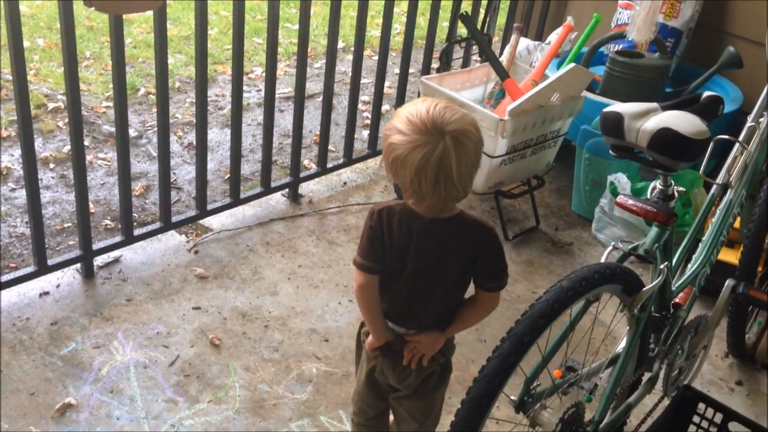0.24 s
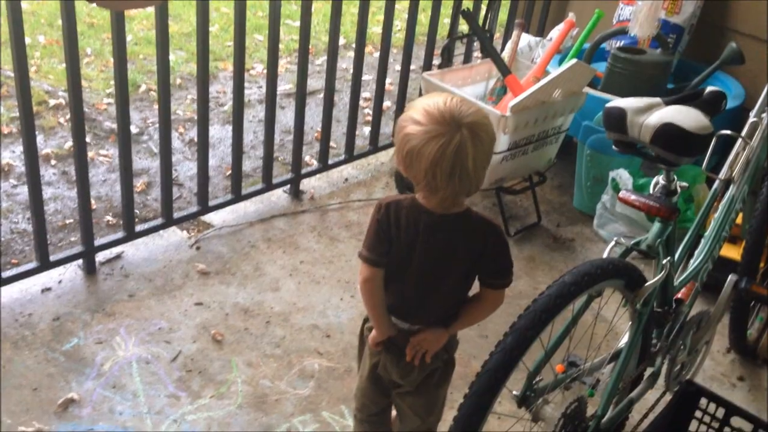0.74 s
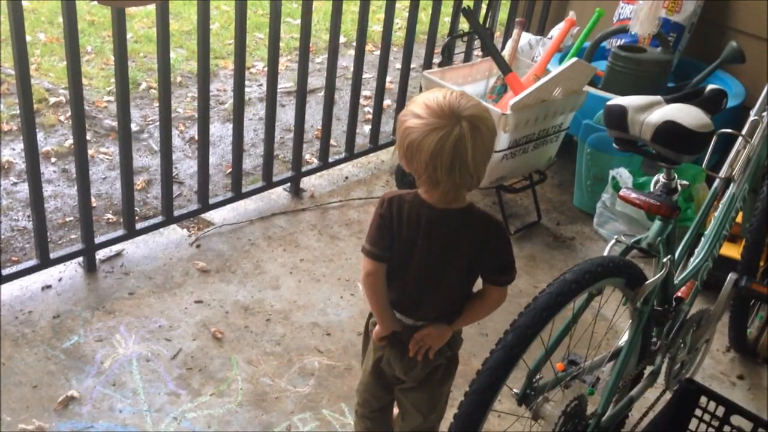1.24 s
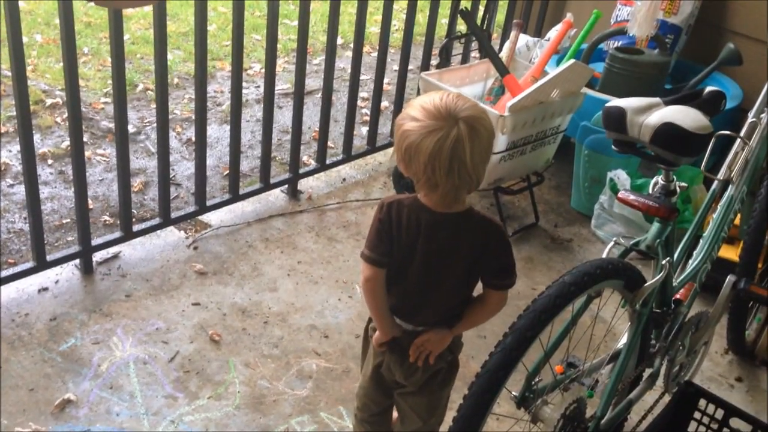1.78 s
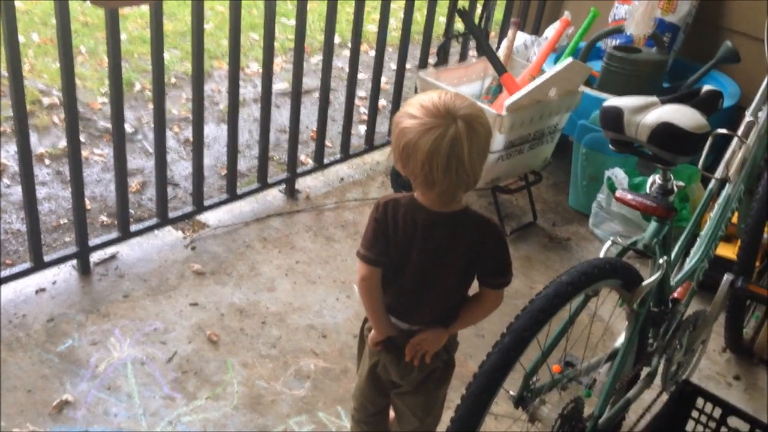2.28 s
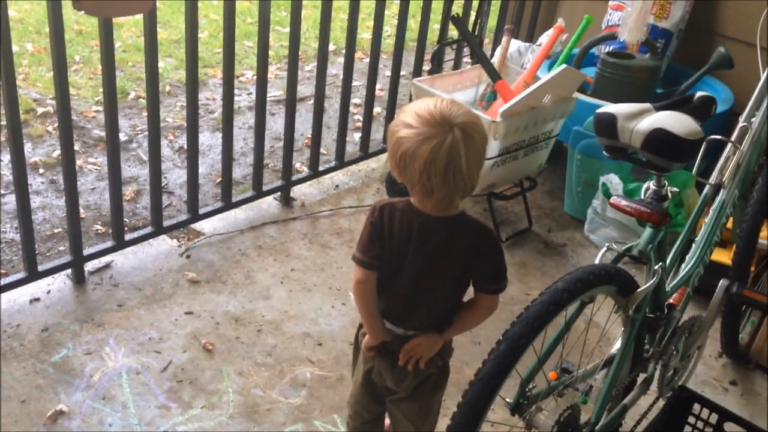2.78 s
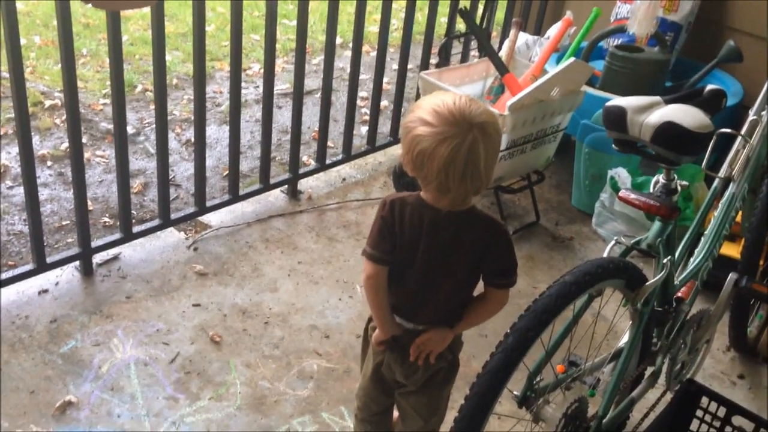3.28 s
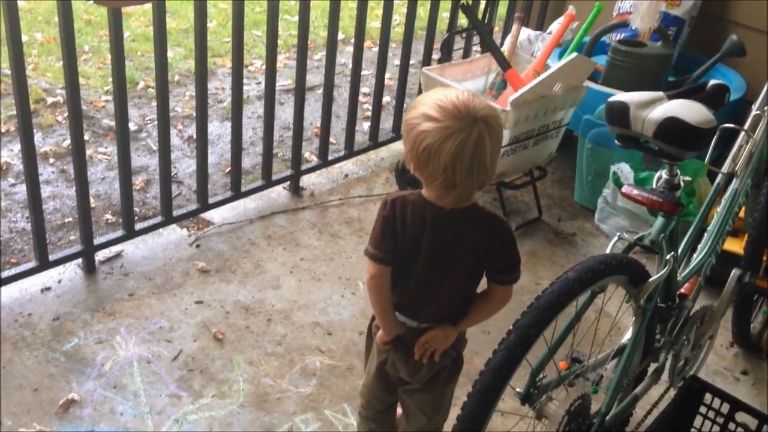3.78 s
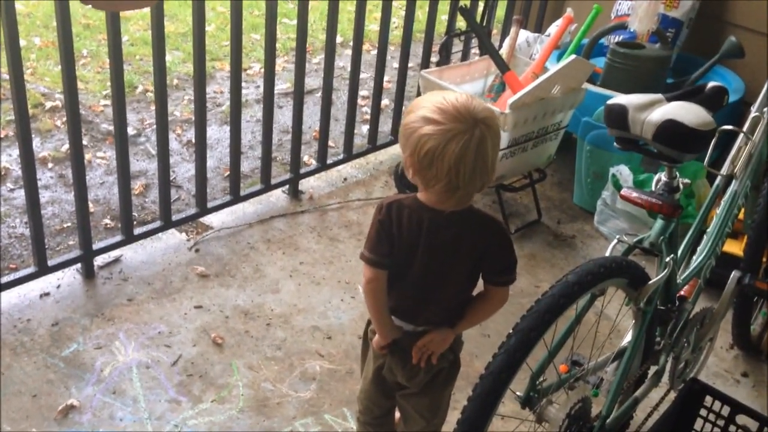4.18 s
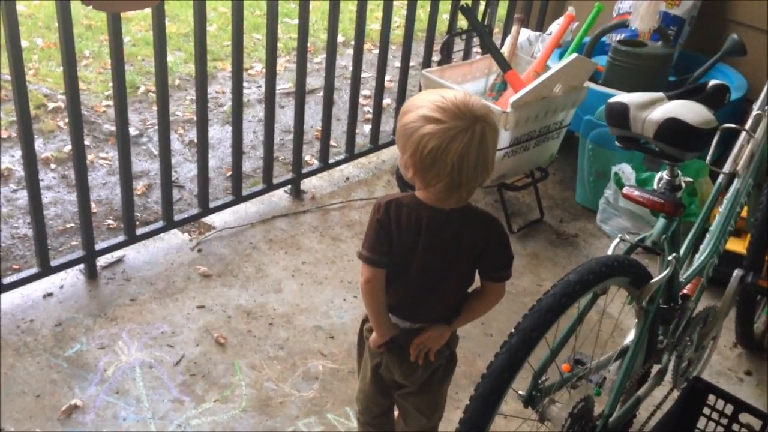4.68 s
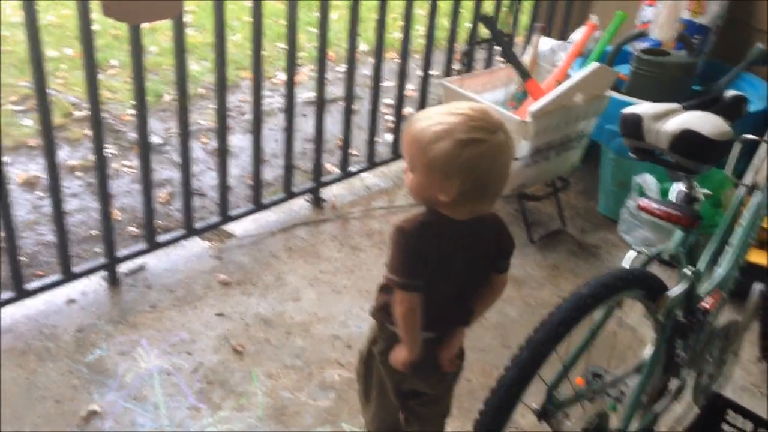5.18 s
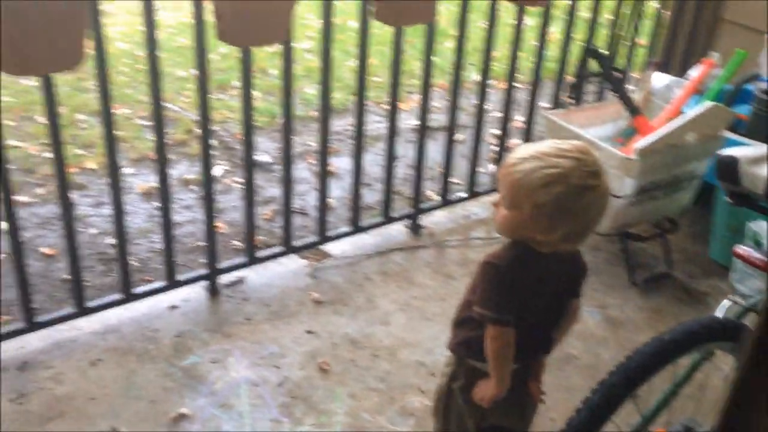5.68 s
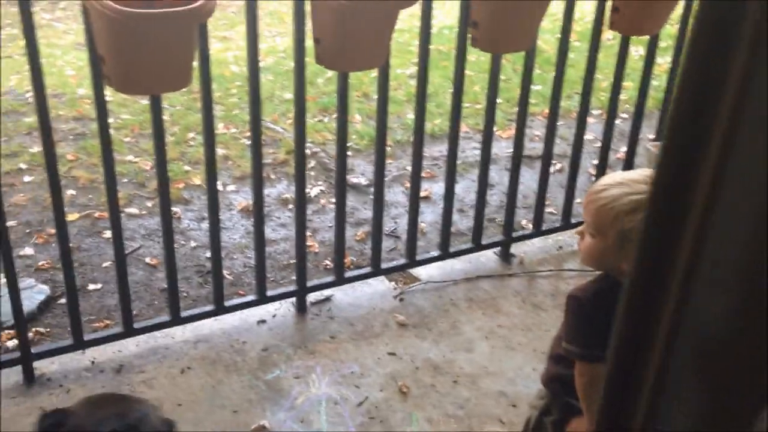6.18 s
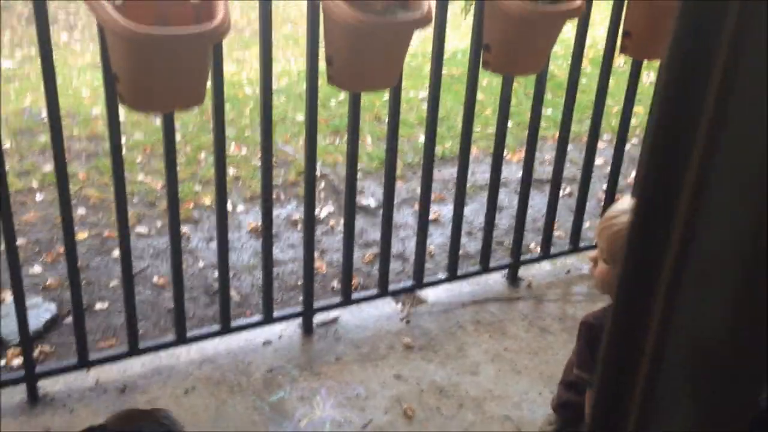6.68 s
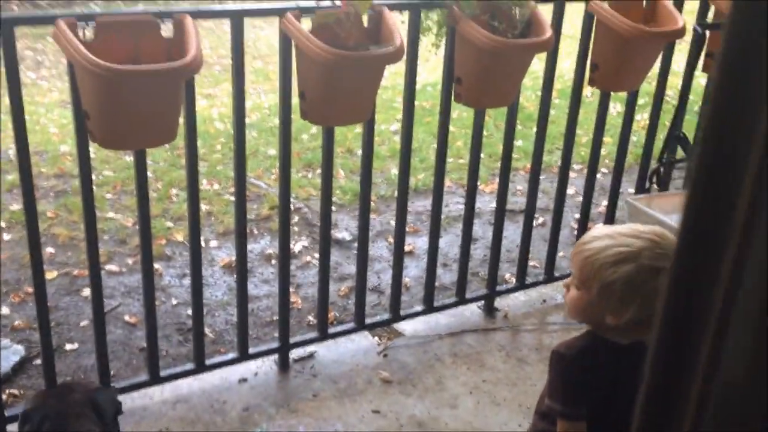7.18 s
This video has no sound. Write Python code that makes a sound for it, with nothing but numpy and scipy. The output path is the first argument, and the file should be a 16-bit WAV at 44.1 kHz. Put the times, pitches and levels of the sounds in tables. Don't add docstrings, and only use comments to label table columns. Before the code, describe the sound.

Steady rain hisses over a lawn beyond a covered patio, with sharp eave drips ticking close by and a faint compressor hum beneath.

```python
import sys
import numpy as np
from scipy import signal
from scipy.fft import rfft, irfft
from scipy.io import wavfile
from scipy.ndimage import uniform_filter1d, minimum_filter1d

SR = 44100
rng = np.random.default_rng(int(sys.argv[2]) if len(sys.argv) > 2 else 0)


def wav_record(signal):
    frames = np.transpose(np.atleast_2d(signal))
    bounded = np.clip(frames, -1, 1)
    quanta = np.round(bounded * 32767).astype(np.int16)
    wavfile.write(sys.argv[1], SR, quanta)


def to_linear_factor(level_db):
    exponent = np.asarray(level_db, float) / 20
    return 10 ** exponent


N = 328545

# t/s, level/dB
RAIN_LEVEL = [(0, -46.5), (2.8, -46), (5.6, -46), (7.45, -47)]
# f/Hz, density/dB
WASH_SPECTRUM = [(210, -48), (330, -10), (450, -11), (700, -13), (1400, -16.5), (2400, -16), (2850, -16),
                 (3650, -17.5), (6250, -19), (9000, -24.5), (12000, -29.5), (15400, -32.5)]
PATTER_PER_S, PATTER_DB, PATTER_SPREAD_DB = 700, -10, 3.2
TAPS_PER_S, TAPS_DB, TAPS_SPREAD_DB = 90, -12.5, 2.8

# t/s, level/dB per kHz, f/Hz, spread/octaves, sharpness/dB
NEAR_DRIPS = [(0.4377, -44, 6000, 0.3, 0), (0.6181, -50.5, 3990.0, 1.3, -2), (1.0359, -52, 5000.0, 0.95, 1),
              (1.2162, -48, 5450, 0.69, -8), (1.259, -55, 5500.0, 1, -12), (1.5898, -59, 6440.0, 1.4, -7),
              (1.8181, -54.5, 9340.0, 0.61, 0), (2.0617, -50.5, 5570, 1.3, 7),
              (2.2389, -58, 10360.0, 0.6, 11), (2.3233, -57, 5830.0, 1.3, 10),
              (2.4256, -55.5, 4500.0, 1.5, 6), (2.5439, -58, 8420.0, 0.92, 6),
              (3.5931, -45.5, 6060, 0.61, -1), (4.3837, -64, 10420.0, 0.57, -4),
              (4.4885, -52.5, 4200.0, 1.4, -3), (4.7639, -55.4, 5400.0, 1.3, -7),
              (5.186, -57, 8960.0, 0.64, 2), (5.4934, -50.5, 4600.0, .6, 1), (5.687, -45.5, 4270, 1.2, 2),
              (5.7894, -61.1, 11190.0, 0.3, 0), (5.9766, -53.5, 7060, 0.96, -10),
              (6.154, -54, 5400.0, 1.4, 4), (6.227, -54.5, 7490.0, 0.62, -3),
              (6.4392, -58.5, 10400.0, 0.55, -1), (6.5838, -43.5, 4870, 1, -1),
              (6.629, -57, 6200.0, 0.89, -1), (7.0905, -49, 4700.0, 0.89, 3),
              (7.3827, -43.5, 4900, 0.6, -1)]
# t/s, level/dB per kHz, f/Hz
FAR_DRIPS = [(0.023, -47, 2500), (0.74, -58, 5600.0), (0.836, -60, 8300.0), (1.4734, -57, 2700.0),
             (1.5103, -70, 12910.0), (1.6436, -65, 6430.0), (3.4492, -59, 4620.0), (3.5025, -56, 3430.0),
             (4.1968, -64.0, 9350.0), (5.132, -73, 7480.0), (5.373, -53, 4000.0), (5.883, -47.5, 3360),
             (6.0972, -63.4, 11120.0), (6.7162, -68, 6030), (6.7723, -58, 6170.0), (6.852, -59.5, 7800.0),
             (6.8931, -60, 6510.0), (6.9326, -65, 3000.0)]
# t/s, level/dB per kHz, f/Hz, spread/octaves
BURST_DROPLETS = [(.6181, -58, 12700, 0.58), (1.2147, -53, 10000, 0.5), (2.0625, -45.5, 3680, 0.33),
                  (2.0617, -56, 11500, 0.31), (3.5931, -54.5, 13500, 0.46), (5.132, -69, 8300, 0.21),
                  (5.4934, -53, 9700, 0.45), (5.627, -57, 7000, .35), (6.7162, -73, 11000, .8),
                  (6.9326, -80, 11000, .8), (5.687, -56, 8550, .3), (5.9766, -62, 8300, .25),
                  (6.5838, -46, 9050, 0.13)]
# delay/s, level/dB
PATIO_ECHOES = [
    (.0027, -5),
    (.0062, -11),
    (.0088, -9),
    (.0117, -10),
    (.0145, -12),
]
FAR_SPREAD_OCTAVES = 0.78
PATIO_T60_S, LOW_T60_S, EARLY_T60_S = .15, .08, .085
LATE_DB, LATE_T60_S = -10, .4
SKIRT_DB, LOW_SKIRT, THUD_HZ = 15, 0.99, 1990
TICK_DB, TICK_DB_PER_OCTAVE = 8, 2
UNEVEN_DB = 2

# t/s, level/dB, brightness/dB, length/s
RUNOFF_SLUGS = [(.146, -55.5, -5, .011), (.216, -48, 3, .008), (.26, -53, 1, 0.021), (.59, -53.5, 4, 0.018),
                (.966, -52.5, -3, 0.0086), (1.051, -63, -14, .013), (1.367, -51.5, -2, 0.0073),
                (1.473, -48, 4, 0.011), (1.692, -51, 1, 0.022), (1.751, -58, -4, 0.036),
                (1.872, -54.5, 6, .008), (2.073, -58, 13, .023), (2.088, -48, -0.5, 0.033),
                (2.136, -49.5, -2, 0.0083), (2.233, -51, -1, .008), (2.407, -52.5, 0, 0.025),
                (2.666, -52, -1, .008), (2.743, -50, -4, .016), (2.914, -51, 3, .06),
                (2.99, -56, -7, 0.056), (3.103, -52.5, -5, .008), (3.213, -51, -5.5, 0.0061),
                (3.492, -52, 4, 0.009), (3.556, -51.5, -1, 0.0082), (3.809, -50, 2, 0.012),
                (3.865, -51, -3, .008), (4.472, -56.5, 0, 0.077), (4.689, -54, -2, 0.021),
                (4.795, -54, -8, 0.019), (5.186, -56, -8, .018)]
# t/s, level/dB, brightness/dB
PIPE_GURGLES = [(.063, -54, -5), (.437, -49, 4), (.472, -57, 10), (.84, -58, -5), (.935, -64, 3),
                (1.23, -56, -4), (2.443, -55, -3), (3.299, -59, -5), (3.655, -60, -7), (4.235, -67, -8),
                (4.82, -63, -6), (5.36, -52, 3), (5.465, -56, 6), (5.925, -62, 15), (6.098, -62, -9),
                (6.181, -59, 10), (6.282, -60, 9), (6.318, -55.5, -1), (6.71, -60, 0), (6.79, -56, -3),
                (7.076, -53, 4)]
# f/Hz, width/Hz, level/dB
PIPE_MODES = [
    (790, 480, 0),
    (1590, 380, 0),
    (2430, 450, -1),
]
# f/Hz, level/dB
SPRAY_SPECTRUM = [(1800, -30), (2900, -3), (3600, 0), (4500, -3), (6500, -18), (16000, -50)]
GURGLE_S, SPRAY_DB, SPLASH_T60_S = 0.013, -5.5, 0.17

# t/s, level/dB, f/Hz
RAILING_TICKS = [(0.0232, -44.4, 9600), (0.1336, -44.6, 8600), (0.1501, -49.0, 9500), (0.2137, -49.7, 9900),
                 (0.2478, -45.5, 11000), (0.2744, -45.3, 8600), (0.345, -45.1, 9400), (0.6915, -48.8, 9300),
                 (0.903, -47.9, 9600), (1.1848, -50.3, 11000), (1.2789, -44.8, 9100),
                 (1.3317, -48.6, 10100), (1.5112, -49.7, 10600), (1.6414, -49.3, 10700),
                 (1.6483, -49.4, 10800), (1.8354, -45.6, 8800), (1.9922, -44.5, 6500),
                 (2.0019, -49.2, 10200), (2.2269, -46.7, 9200), (2.3017, -44.9, 8500),
                 (2.4432, -48.3, 11000), (2.8464, -49.6, 10400), (2.8754, -46.6, 7500),
                 (3.2465, -47.3, 8100), (3.4509, -45.6, 8800), (3.6595, -48.3, 10300),
                 (3.7385, -50.1, 9400), (3.8428, -48.1, 10600), (3.8787, -48.6, 9700),
                 (3.8911, -44.7, 8100), (4.0214, -50.9, 11500), (4.0683, -46.9, 10100),
                 (4.2733, -44.7, 9700), (4.3422, -45.2, 10900), (4.4029, -48.1, 11800),
                 (4.6803, -44.7, 10400), (4.6884, -49.7, 10600), (4.8945, -50.1, 9900),
                 (5.0441, -50.1, 11800), (5.1325, -42.2, 8600), (5.2319, -46.9, 9500),
                 (5.3789, -42.9, 7600), (5.5993, -47.7, 8900), (5.6248, -44.9, 9200),
                 (5.7651, -44.1, 10000), (5.8465, -47.3, 9000), (6.3048, -48.6, 9000),
                 (6.339, -50.7, 10000), (6.3806, -45.2, 8400), (6.5378, -47.7, 8100), (6.5542, -48.4, 9500),
                 (6.6627, -46.0, 9800), (6.7165, -44.3, 9500), (6.7778, -43.0, 7700),
                 (6.9328, -42.6, 10100), (7.0149, -48.3, 9300), (7.0369, -49.7, 9500),
                 (7.4114, -47.5, 10300), (7.4279, -51, 10000), (7.4491, -46.6, 7100)]
# t/s, level/dB, f/Hz
DRIP_SPLINTERS = [(1.2149, -42, 12000), (1.222, -43, 4000), (1.2695, -46, 4300), (1.306, -42, 4500),
                  (6.6294, -45, 6000), (6.662, -45, 7000), (1.2765, -47, 11000), (3.5978, -46, 6300),
                  (5.6825, -40, 7500), (5.6985, -39.5, 6000), (7.3852, -39, 4800), (7.3938, -42, 5200)]
TICK_CYCLES, TICK_TAIL, TICKS_DB = .9, .13, .5

# t/s, level/dB, f/Hz, length/s
PUDDLE_BUBBLES = [(.812, -58, 2540, .022), (.845, -59, 2400, .03), (.887, -57, 2680, .02),
                  (.935, -51, 2520, .025), (0.964, -53, 2400, 0.026), (1.005, -56, 2070, .022),
                  (1.068, -57, 2420, .022), (1.1, -60, 2080, .045), (1.222, -52, 1430, 0.015),
                  (1.218, -59, 2700, .02), (1.235, -59, 2140, .022), (1.285, -56, 2190, 0.035),
                  (.915, -58, 2080, .03), (0.958, -55, 1904, .028), (1.165, -60, 2200, .02),
                  (1.325, -56, 2280, .022), (1.34, -55, 1720, 0.023), (1.364, -53, 2395, .03),
                  (1.372, -56, 1495, .03)]
BUBBLE_RISE_HZ_PER_S = 4500

# t/s, f/Hz, level/dB, length/s
BRAKE_SQUEAL = (5.728, 1948.5, -57.5, .18)

# t/s, level/dB
HUM_LEVEL = [(0, -47), (.3, -45), (.7, -46.5), (2, -45.5), (2.2, -48), (2.35, -45.5), (2.8, -45),
             (3.2, -45.5), (3.6, -46), (3.9, -45), (4.1, -48), (5, -48), (5.2, -49.5), (5.45, -47.5),
             (5.7, -51), (6.1, -47.5), (6.3, -49.5), (7.45, -47.5)]
# t/s, level/dB
RUMBLE_LEVEL = [(0, -49.5), (.55, -54), (.72, -46.5), (1.05, -52), (1.35, -49.5), (1.6, -51.5),
                (2.2, -51.5), (2.8, -49), (3.3, -52.5), (3.75, -50.5), (4.6, -50.5), (5.2, -50.5), (6, -52),
                (7.45, -52)]
# f/Hz, density/dB
RUMBLE_SPECTRUM = [(20, -60), (35, -51), (55, -10.5), (80, -11), (115, -11), (135, -4), (150, 0.5),
                   (172, -6), (198, -2.5), (245, -8.5), (295, -4.5), (330, -10), (430, -58), (700, -103)]
# t/s, peak/dB, f/Hz
RUMBLE_THUMPS = [(0.299, -43, 206), (0.606, -41, 180), (0.715, -46, 231), (0.976, -45, 218),
                 (1.169, -38, 161), (1.749, -38, 158), (2.11, -39, 181), (2.554, -43, 171),
                 (2.644, -37, 164), (2.79, -36, 147), (2.939, -38, 144), (3.15, -37, 196),
                 (3.306, -45, 172), (3.741, -41, 170), (3.837, -34, 150), (4.239, -31, 144),
                 (4.334, -45, 161), (4.426, -39, 158), (4.845, -34, 128), (5.139, -54, 146),
                 (5.444, -40, 157), (6.11, -51, 153), (6.381, -42, 157), (7.114, -38, 156)]
HUM_HZ, HUM_OCTAVE_DB, HUM_WAVER_DB = 349.0, -22, 1.2
THUMP_DB, THUMP_RISE_S, THUMP_T60_S = -1, 0.0058, 0.12

# f/Hz, level/dB
PORT_NOTCH = [(2450, 0), (2650, -4), (2750, -3), (2900, -4.5), (3200, 0)]
# t/s, share/1
NOTCH_SHARE = [(0, 1), (5, .9), (6, .35), (7.45, .35)]
# t/s, rarity/standard deviations
GAP_RARITY = [(0, 2.3), (3.3, 1.8), (3.8, 1.1), (6.8, 1.1), (7.45, 2.8)]
# t/s, f/Hz, level/dB
SIDE_PATCHES = [(.56, 13200, -80), (1.1, 11100, -76), (1.45, 9700, -69), (1.73, 12800, -71),
                (1.75, 8300, -67), (3.38, 11700, -71), (4.23, 5200, -64), (4.61, 10400, -70),
                (4.97, 6100, -61), (5.28, 5800, -64), (7.25, 9000, -67)]
EDGE_HZ, SPILL_OVER_DB, SPILL_DB = 15310, 5, -28


def evened(x):
    return x / np.sqrt(np.mean(x ** 2) + 1e-20)


def smooth_twice(x, samples):
    return evened(uniform_filter1d(uniform_filter1d(x, size=samples), size=samples))


def read(points, hz):
    f, value = np.transpose(points)
    return np.interp(np.log(hz + 1), np.log(f + 1), value)


def along(rows):
    return np.interp(np.arange(N) / SR, *np.transpose(rows))


def add(mix, s, sound):
    part = mix[max(round(s * SR), 0):][:len(sound)]
    part += sound[:len(part)]


def colour(x, points):
    return irfft(rfft(x) * to_linear_factor(read(points, np.fft.rfftfreq(len(x), 1 / SR))), len(x))


def ring(x, points):
    gain_db = np.maximum(read(points, abs(np.fft.fftfreq(len(x), 1 / SR))), -130)
    response = np.exp(np.conj(signal.hilbert(np.log(to_linear_factor(gain_db)))))
    return np.fft.ifft(np.fft.fft(x) * response).real


def hiss(points, patchy_db, flicker_db, size):
    frames, hz = 4 * N // size + 5, np.fft.rfftfreq(size, 1 / SR)
    a, b, patches, flicker = rng.standard_normal((frames, len(hz), 4)).T
    patches = evened(uniform_filter1d(uniform_filter1d(patches, size=12, axis=0), size=10, axis=1))
    flicker = uniform_filter1d(flicker, size=len(hz) // 3, axis=0)
    flicker = evened(uniform_filter1d(flicker, size=3, axis=1))
    level_db = read(points, hz)[:, None] + patchy_db * patches
    level_db = level_db + flicker_db * flicker * (hz[:, None] / 4000) ** .3
    z = (a + 1j * b) * to_linear_factor(level_db)
    return evened(signal.istft(z, nperseg=size, noverlap=size * 3 // 4)[1][:N])


def random_drops(per_s, spread_db, most):
    size = to_linear_factor(spread_db * np.minimum(rng.exponential(1, N), most))
    return size * (rng.random(N) < per_s / SR)


def rain():
    wash = hiss(WASH_SPECTRUM, patchy_db=1.5, flicker_db=1.15, size=512)
    total = wash + to_linear_factor(PATTER_DB) * patter() + to_linear_factor(TAPS_DB) * taps()
    return to_linear_factor(along(RAIN_LEVEL)) * evened(total)


def patter():
    drops = random_drops(PATTER_PER_S, PATTER_SPREAD_DB, 3.3)
    kind, t, out = rng.integers(0, 24, N), np.arange(2600) / SR, np.zeros(N)
    for k, hz in enumerate(np.geomspace(1500, 14000, num=24)):
        snap = np.sin(2 * np.pi * hz * t) * np.exp(-t * hz)
        tail = np.zeros(len(t))
        tail[0] = 1
        tail += 0.22 * rng.standard_normal(len(t)) * to_linear_factor(-60 * t / PATIO_T60_S)
        grain = evened(signal.fftconvolve(snap, tail)[:len(t)])
        grain *= to_linear_factor(read(WASH_SPECTRUM, hz)) * np.sqrt(hz) * (1 + hz / 20000)
        out += signal.oaconvolve(drops * (kind == k), grain)[:N]
    return evened(out)


def taps():
    drops = random_drops(TAPS_PER_S, TAPS_SPREAD_DB, 3.5)
    kind, out = rng.integers(0, 8, N), np.zeros(N)
    for k, hz in enumerate(np.geomspace(2500, 12000, num=8)):
        grain = tick(hz, rng.standard_normal(2048)) * (2500 / hz) ** .4
        out += signal.oaconvolve(drops * (kind == k), grain)[:N]
    return evened(out)


def tick(hz, chance):
    t = np.arange(len(chance)) / SR
    snap = np.sin(2 * np.pi * .62 * hz * t[:64]) * np.exp(-t[:64] * hz / TICK_CYCLES)
    tail = TICK_TAIL * chance * (t > .002) * to_linear_factor(-60 * t / PATIO_T60_S) + (t == 0)
    return np.convolve(np.diff(snap, prepend=0) / np.linalg.norm(np.diff(snap)), tail)


def drip_blow(hz, sharp_db, chance):
    blow = np.zeros(len(chance))
    blow[64] = 1
    for s, echo_db in PATIO_ECHOES:
        delay = round(s * SR)
        blow[64 + delay] = to_linear_factor(echo_db + 2 * chance[delay] - 1.3 * max(sharp_db, 0))
    pole = [1, -1.6 * np.cos(2 * np.pi * hz / SR), .64]
    return signal.lfilter(pole[::-1], pole, blow)


def drip_tail(t, chance):
    low = signal.sosfilt(signal.butter(3, 4200, fs=SR, output="sos"), chance[::-1])
    high = signal.sosfilt(signal.butter(3, 4200, "high", fs=SR, output="sos"), chance)
    scattered = high + 1.3 * low * to_linear_factor(-60 * t / LOW_T60_S + 60 * t / PATIO_T60_S)
    scattered *= to_linear_factor(1.5 * evened(uniform_filter1d(chance[::-1], size=130)))
    fills = 1 - np.exp(-(np.maximum(t, 0) / .0015) ** 2)
    tail = np.convolve(scattered, [1, .25])[:len(t)] * fills
    late = to_linear_factor(LATE_DB - 60 * t / LATE_T60_S) * np.cos(np.pi / 2 * t / t[-1])
    return tail * (to_linear_factor(-60 * t / EARLY_T60_S) + late)


def drip(db, hz, spread, sharp_db, chance):
    t = (np.arange(len(chance)) - 64) / SR
    blow = np.convolve(drip_blow(hz, sharp_db, chance), [1, -.2])[:len(t)]
    tick_db = TICK_DB + sharp_db + TICK_DB_PER_OCTAVE * np.log2(hz / 6000)
    burst = 6.5 * to_linear_factor(tick_db) * blow + drip_tail(t, chance)
    f = np.geomspace(500, 20000, num=60)
    spreads_off = np.log2(f / hz) / (spread * np.where(f < hz, LOW_SKIRT, 1))
    bell = db - SKIRT_DB * spreads_off ** 2 - 10 * np.log10(1 + (THUD_HZ / f) ** 3)
    bell = np.maximum(bell, db - 40) + UNEVEN_DB * evened(uniform_filter1d(chance[-60:], size=2))
    return to_linear_factor(13.4) * ring(burst / np.std(burst[64:944]), list(zip(f, bell)))


def pipe_mode(hz, f, width, db):
    band = np.exp(-(np.log(hz / f + 1e-9) / .55) ** 4)
    return to_linear_factor(db) * (.4 + 1 / (1 + (2 * (hz - f) / width) ** 2)) * band


def splash(low_db, upper_db, spray_db, length, chance):
    t, hz = np.arange(len(chance)) / SR, np.fft.rfftfreq(len(chance), 1 / SR)
    broken = chance * to_linear_factor(3.2 * evened(uniform_filter1d(chance[::-1], size=110)))
    modes = [pipe_mode(hz, *row) for row in PIPE_MODES]
    low = evened(irfft(rfft(broken) * modes[0], len(t)))
    upper = evened(irfft(rfft(broken) * sum(modes[1:]), len(t)))
    spray = evened(colour(broken, SPRAY_SPECTRUM))
    sound = to_linear_factor(low_db - 3.5) * low + to_linear_factor(upper_db) * upper + to_linear_factor(spray_db) * spray
    decay = to_linear_factor(2.0 - 60 * np.maximum(t - length, 0) / SPLASH_T60_S)
    return decay * (1 - np.exp(-t / .0018)) * sound


def bubble(db, hz, length):
    t = np.arange(round(length * SR)) / SR
    tone = np.sin(2 * np.pi * (hz + BUBBLE_RISE_HZ_PER_S * t / 2) * t)
    return to_linear_factor(db + 5) * np.sin(np.pi * (t / length) ** .7) * tone


def squeal():
    s, hz, db, length = BRAKE_SQUEAL
    t = np.arange(round(length * SR)) / SR
    swell_db = 6 * np.sin(np.pi * (t / length) ** .7) - 5 * t / length
    swell = signal.windows.tukey(len(t), .3) * to_linear_factor(swell_db)
    flutter = to_linear_factor(.6 * smooth_twice(rng.standard_normal(len(t)), 250))
    return s, to_linear_factor(db) * swell * flutter * np.sqrt(2) * np.sin(2 * np.pi * hz * t)


def compressor():
    turn = 2 * np.pi * HUM_HZ * np.arange(N) / SR
    waver = smooth_twice(rng.standard_normal(N), 1500)
    line = np.sqrt(2) * (np.sin(turn) + to_linear_factor(HUM_OCTAVE_DB) * np.sin(2 * turn))
    rumble = hiss(RUMBLE_SPECTRUM, patchy_db=2.0, flicker_db=1.5, size=4096)
    return to_linear_factor(along(HUM_LEVEL) + HUM_WAVER_DB * waver) * line + to_linear_factor(along(RUMBLE_LEVEL)) * rumble


def thump(db, hz):
    t = np.arange(8192) / SR
    decay = to_linear_factor(db + THUMP_DB - 60 * t / THUMP_T60_S)
    return decay * (1 - np.exp(-t / THUMP_RISE_S)) * np.sin(2 * np.pi * hz * t)


def scene():
    mix = rain() + compressor()
    drips = list(NEAR_DRIPS)
    drips += [(*row, FAR_SPREAD_OCTAVES, 0) for row in FAR_DRIPS]
    drips += [(*row, 0) for row in BURST_DROPLETS]
    for s, *row in drips:
        add(mix, s - 64 / SR, drip(*row, rng.standard_normal(6144)))
    slugs = list(RUNOFF_SLUGS) + [(*row, GURGLE_S) for row in PIPE_GURGLES]
    for s, db, bright_db, length in slugs:
        chance = rng.standard_normal(8192)
        add(mix, s, splash(db - bright_db, db, db + SPRAY_DB + bright_db, length, chance))
    for rows, gain_db in [(RAILING_TICKS, TICKS_DB), (DRIP_SPLINTERS, 0)]:
        for s, db, hz in rows:
            add(mix, s, np.sqrt(30) * to_linear_factor(db + gain_db) * tick(hz, rng.standard_normal(2048)))
    for s, *row in PUDDLE_BUBBLES:
        add(mix, s, bubble(*row))
    add(mix, *squeal())
    for s, *row in RUMBLE_THUMPS:
        add(mix, s, thump(*row))
    return np.array([mix, mix])


def treble_gaps(x):
    hz, t, z = signal.stft(x, SR, nperseg=2048, noverlap=1536)
    field = rng.standard_normal(z.shape)
    field = evened(uniform_filter1d(uniform_filter1d(field, size=6, axis=0), size=5, axis=1))
    rarity = np.interp(t, *np.transpose(GAP_RARITY))
    rarity = rarity + 2.2 * np.log(13500 / np.clip(hz, 1, 13500))[:, None]
    treble = (abs(z[hz > 8000]) ** 2).sum(0)
    calm = treble < 1.4 * np.median(treble)
    empty = (-minimum_filter1d(-field, size=3, axis=1) > rarity) & calm
    return signal.istft(z * np.where(empty, .02, 1), SR, nperseg=2048, noverlap=1536)[1][:N]


def side_patches():
    out, hz = np.zeros(N), np.fft.rfftfreq(2048, 1 / SR)
    for s, centre_hz, db in SIDE_PATCHES:
        band = abs(hz - centre_hz) < 800
        patch = evened(irfft(rfft(rng.standard_normal(2048)) * band))
        add(out, s - 1024 / SR, to_linear_factor(db + 4) * patch * np.hanning(2048))
    return out


def band_limit(x):
    return signal.sosfilt(signal.butter(12, 16440, fs=SR, output="sos"), x)


def record(dry):
    port = dry[0] + along(NOTCH_SHARE) * (colour(dry[0], PORT_NOTCH) - dry[0])
    edge = signal.firwin(1023, EDGE_HZ, window=("kaiser", 9), fs=SR)
    kept = signal.oaconvolve(port, edge, "same")
    above = port - kept
    power = uniform_filter1d(above ** 2, size=256)
    sudden = uniform_filter1d(1. * (power > np.median(power) * to_linear_factor(2 * SPILL_OVER_DB)), size=256)
    mono = treble_gaps(kept) + to_linear_factor(SPILL_DB) * sudden * above
    mix = mono + np.array([[1], [-1]]) * side_patches()
    return band_limit(mix)


dry = scene()
out = record(dry)
wav_record(out)
```